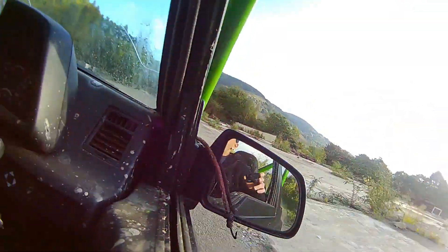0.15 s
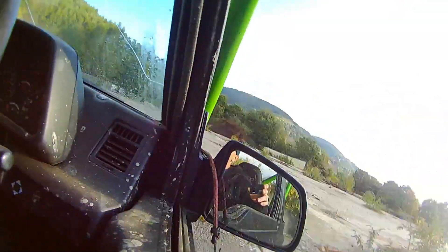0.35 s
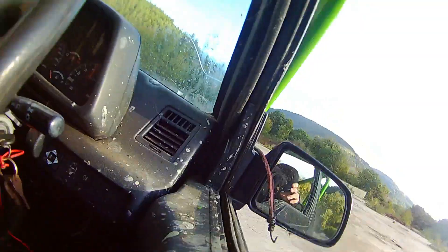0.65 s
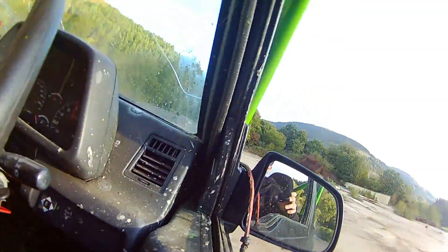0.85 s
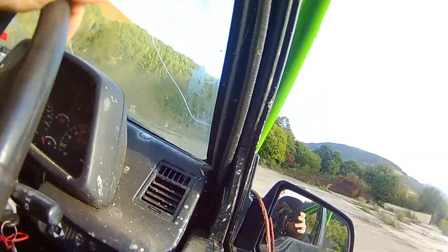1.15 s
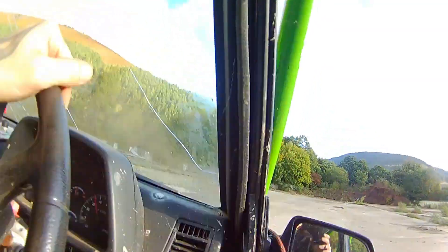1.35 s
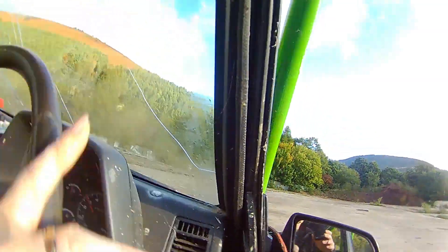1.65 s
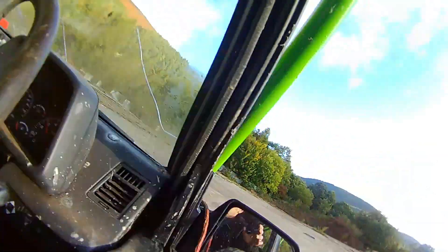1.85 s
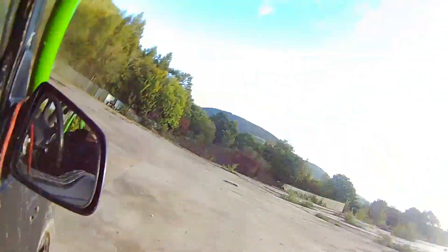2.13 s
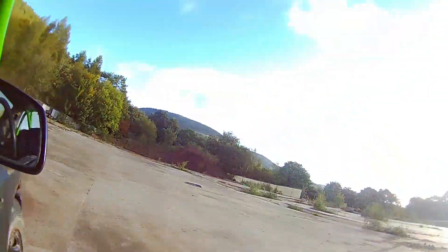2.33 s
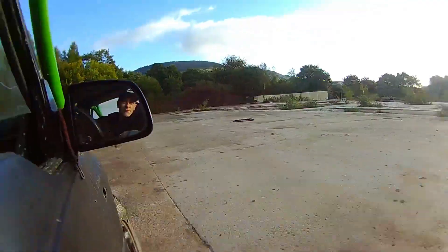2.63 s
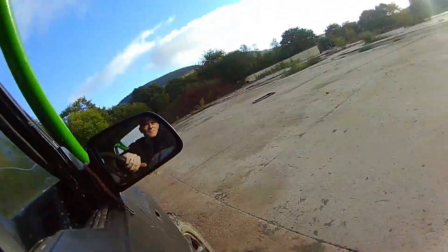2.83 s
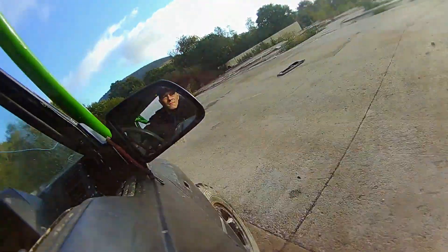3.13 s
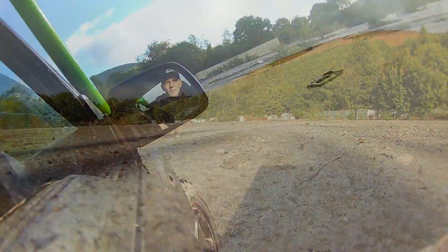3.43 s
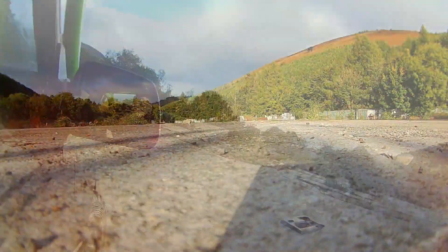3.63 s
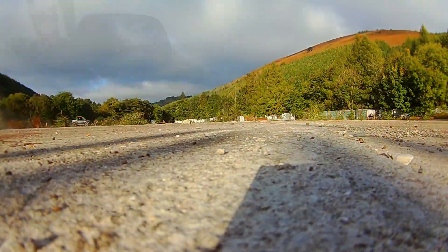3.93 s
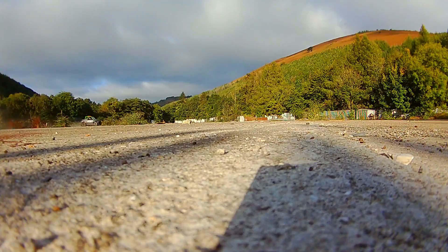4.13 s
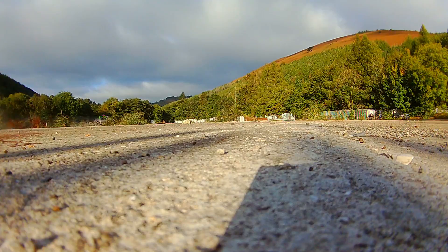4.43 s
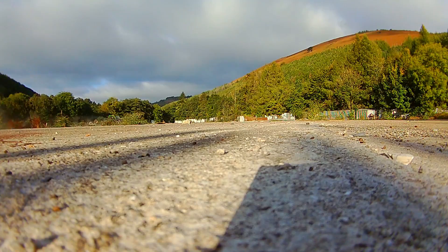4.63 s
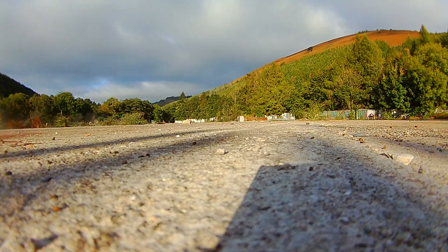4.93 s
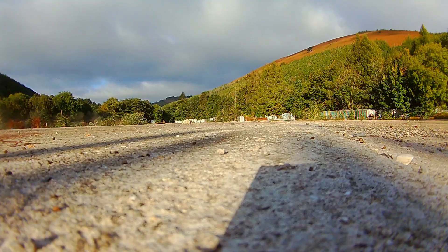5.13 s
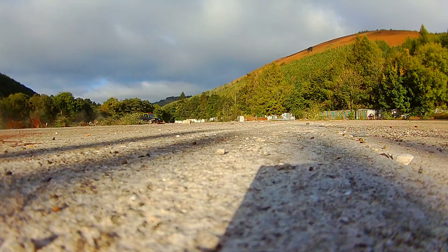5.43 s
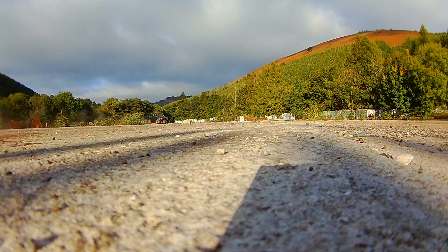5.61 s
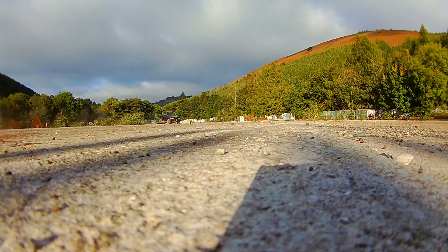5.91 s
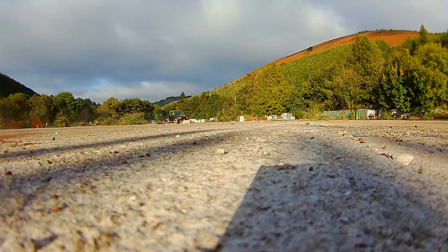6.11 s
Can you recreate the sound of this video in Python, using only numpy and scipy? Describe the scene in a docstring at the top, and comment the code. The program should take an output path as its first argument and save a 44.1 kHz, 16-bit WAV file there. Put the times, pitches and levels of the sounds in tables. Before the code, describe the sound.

A petrol buggy is heard from its open cab, loud and distorted: booming exhaust, tyres roaring over concrete, sizzling grit and wind, with gusts at the start and around 2 seconds. The engine note falls over the first 1.5 seconds, then wavers lower down, chugging when the throttle lifts near 0.5, 2 and 2.9 seconds. Short tyre squeals and knocks from stones and loose panels come at about 0.9 to 1.3 seconds, then again more busily from 2.9 to 3.5 as the buggy skids.

At 3.5 seconds a hard cut moves to a quieter position on the ground, some way off. The engine climbs to high revs by 4.4 seconds and holds a nasal drone over a broad roar, gravel hiss, a few tiny chassis squeaks and a very faint electronic whine. At about 5.8 seconds the throttle closes, the note drops and the tyres chirp faintly twice.

```python
"""A petrol buggy thrown around a concrete lot. First the microphone rides in the open cab: exhaust boom,
wind and tyre roar overload it, stones and loose panels knock, and the tyres squeal into a skid.
At 3.5 s a hard cut puts the microphone on the ground some way off, with a faint camera whine. The engine
pulls up to high revs and holds them over gravel hiss and small chassis squeaks; then the throttle
closes, the note drops and the tyres chirp."""
import sys
import numpy as np
from scipy import signal
from scipy.io import wavfile

SR = 44100
rng = np.random.default_rng(int(sys.argv[2]) if len(sys.argv) > 2 else 0)


def store_pcm(level_fs):
    """Save levels as 16-bit WAV."""
    pcm = np.round(np.clip(level_fs, -1, 1) * 32767).astype(np.int16)
    wavfile.write(sys.argv[1], SR, np.atleast_2d(pcm).T)


N = 276507
TIME = np.arange(N) / SR
CUT_S = 3.534

# Levels in the tables are relative; each source adds its own gain.
# engine speed in the cab: time_s, firing_hz
CAB_REVS = [(0.0, 150.5), (0.07, 153.2), (0.18, 143), (0.42, 141), (0.65, 129.5), (0.93, 116.5),
            (1.05, 116.2), (1.3, 96), (1.44, 87.8), (1.56, 98), (1.69, 94), (1.8, 99.7), (2.01, 102),
            (2.11, 90.5), (2.275, 95.5), (2.32, 105), (2.53, 102), (2.8, 108.5), (2.93, 119), (3.01, 99.6),
            (3.25, 90.1), (3.44, 91.5), (3.53, 96.5)]
# how the cab booms at the low firing orders: frequency_hz, level_db
CAB_BOOM = [(86, -12), (106, -9.5), (125, -5.5), (147, -7.5), (178, -9), (194, -13), (205, -7.5),
            (219, -16), (262, -9.5), (286, -5), (306, -12), (345, -15), (420, -16), (470, -23)]
# pipe resonances from the cab: frequency_hz, level_db
CAB_PIPE = [(380, 6), (480, 6), (570, -0.5), (660, 5.5), (800, -8.5), (1000, -21), (1500, -69)]
# the four cylinders fire unequally: level_db
CYLINDER_DB = [4, 1.5, 1, -1]
# wind buffeting the microphone: frequency_hz, level_db
WIND_SPECTRUM = [(22, 1.5), (40, -10.5), (70, -5), (130, -12), (250, -14), (500, -18.5), (1000, -36)]
# gusts on the microphone: centre_s, level_db
GUSTS = [(0.02, -8), (0.42, -10), (1.7, -32.5), (2.07, -17), (3.05, -31)]
# tyres scrubbing over concrete: time_s, roar_db, grit_db
SCRUB = [(0.0, -24.5, -40), (0.16, -21.5, -38), (0.93, -27, -39.5), (1.21, -25, -40), (1.47, -31.5, -42),
         (1.98, -24, -40.5), (2.24, -24, -46.5), (2.36, -22.5, -39), (2.92, -16.5, -38), (3.03, -19.5, -45),
         (3.49, -18.5, -40), (3.5, -16.5, -37)]
# tyre roar close up: frequency_hz, level_db
TYRE_SPECTRUM = [(100, 11), (250, 2.5), (600, 2), (900, -1), (1250, 3.5), (1700, -7), (2300, -10.5),
                 (4000, -25.5), (8000, -33), (15000, -82)]
# sprayed grit close up: frequency_hz, level_db
GRIT_SPECTRUM = [(2000, -34), (3800, 11.5), (5500, 1), (8000, 2.5), (11500, 2.5), (13200, -14),
                 (16000, -12)]
# air hiss in the cab: frequency_hz, level_db
AIR_SPECTRUM = [(3000, 2.5), (7000, -7), (11500, -6.5), (13200, -10), (16000, -6.5)]
# the driver lifts off the throttle: shut_s, reopen_s, pedal_travel_s, overtone_loss_db
LIFTS = [(0.537, 1.106, 0.12, 5.5), (1.99, 2.3, 0.063, 18.5), (2.898, 3.507, 0.029, 9),
         (5.845, 6.499, 0.031, 14)]
# stones and loose panels knock: start_s, level_db
KNOCKS = [(0.8606, -14.5), (0.9567, -23), (1.1473, -32), (1.166, -15), (1.9855, -19), (2.867, -15),
          (2.9504, -6.5), (2.9789, -12), (3.074, -15.5), (3.129, -15.5), (3.212, -12), (3.3156, -11),
          (3.4281, -22)]
# tyres hop and slide in the turns: centre_s, half_length_s, pitch_hz, level_db, octave_db
SQUEALS = [(0.89, 0.035, 732, -9, -39), (0.97, .018, 705, -6.5, -24), (1.093, 0.034, 667, -8, -18),
           (1.154, .012, 665, -8.5, -24), (1.237, .02, 649, -7.5, -23), (1.292, .025, 658, -10, -37),
           (2.93, 0.076, 620, -12, -31), (3.13, 0.054, 587, -15.5, -19), (3.225, .018, 549, -7.5, -5),
           (3.312, .035, 603.7, -8, -2.5), (3.345, .06, 544, -3.5, -7.5), (3.515, 0.021, 568, -6, -6),
           (6.014, 0.021, 708.6, -25, -47), (6.069, .02, 713, -28.5, -46)]
# the exhaust note drops out for an instant: centre_s, dip_db
BREAKS = [(2.306, -3), (2.925, -9), (3.385, -13), (5.85, -16)]
# engine speed at a distance: time_s, firing_hz
FAR_REVS = [(3.54, 120.1), (3.75, 123.3), (4.18, 136.6), (4.4, 141.7), (4.7, 140.6), (4.97, 145.2),
            (5.16, 143.1), (5.33, 146.7), (5.82, 139.8), (5.865, 130.7), (6.02, 106.9), (6.13, 83.7),
            (6.27, 84.1)]
# distant firing note: time_s, level_db
FAR_NOTE = [(3.6, -23), (3.62, -24), (3.74, -25), (3.84, -19.5), (3.99, -20.5), (4.24, -14.5), (5.6, -17),
            (5.95, -23), (6.27, -27.5)]
# distant nasal drone of orders 3 and 4: time_s, level_db
FAR_DRONE = [(3.6, -24.5), (4.1, -21), (4.55, -24), (5.2, -24.5), (5.7, -21), (5.85, -21.5)]
# pipe resonances at a distance: frequency_hz, level_db
FAR_PIPE = [(400, -4), (600, 11), (720, 5.5), (850, 3.5), (1000, -5), (1150, 1.5), (1400, -3), (2200, -39)]
# one order of the drone fades briefly: centre_s, half_length_s, order, dip_db
FADES = [(3.587, 0.059, 4, -13), (3.84, 0.058, 3, -4), (3.95, 0.053, 4, -8), (4.27, .06, 4, -4.5),
         (4.276, 0.054, 3, -13), (4.687, 0.078, 4, -11), (4.8, 0.13, 3, -13), (5.226, 0.07, 4, -7)]
# distant rush of the car: time_s, roar_db, gravel_db
FAR_RUSH = [(3.63, -35.5, -48.5), (3.81, -35, -52), (3.94, -35.5, -46.5), (5.3, -32.5, -45.5),
            (5.67, -32.5, -49.5), (5.81, -33, -46), (5.92, -36.5, -51.5), (6.27, -42.5, -56)]
# distant roar: frequency_hz, level_db
ROAR_SPECTRUM = [(25, -9), (50, 4.5), (100, -11), (200, 6.5), (350, 1), (600, 7), (900, 1), (1350, -0.5),
                 (1750, -10), (2200, -9.5), (3000, -24), (4500, -33), (8000, -64)]
# distant gravel hiss: frequency_hz, level_db
GRAVEL_SPECTRUM = [(2500, -10), (3700, 1), (4500, -11), (5500, -2), (7000, 3.5), (8900, -20), (11300, -10),
                   (14000, -29)]
# distant chassis squeaks: centre_s, pitch_hz, level_db
SQUEAKS = [(4.81, 7500, -38), (5.245, 2240, -25), (5.965, 10200, -52), (6.243, 6200, -58)]


def from_db(db):
    """Decibels to gain."""
    return 10 ** (np.asarray(db) / 20)


def rms_one(x):
    """Scale to unit power."""
    return x / np.sqrt(np.mean(x ** 2) + 1e-20)


def in_time(rows):
    """Each column of a curve table at every sample."""
    times, *columns = np.transpose(rows)
    return [np.interp(TIME, times, column) for column in columns]


def at_hz(spectrum, hz):
    """Read a spectrum on a log-frequency axis."""
    freqs, levels = np.transpose(spectrum)
    return np.interp(np.log(hz), np.log(freqs), levels)


def swell(centre_s, half_length_s):
    """A smooth rise and fall around a moment."""
    return np.exp(-((TIME - centre_s) / half_length_s) ** 2)


def drift(rate_hz):
    """Smooth random wander of spread 1."""
    hop, settle = 40, 2000
    pole = np.exp(-2 * np.pi * rate_hz * hop / SR)
    white = rng.standard_normal(N // hop + settle + 2)
    slow = signal.lfilter([1], [1, -2 * pole, pole * pole], white)[settle:]
    return np.interp(np.arange(N) / hop, np.arange(len(slow)), rms_one(slow))


def butter(x, hz, kind, order=2):
    """Causal Butterworth filter."""
    return signal.sosfilt(signal.butter(order, hz, kind, fs=SR, output="sos"), x)


def band_noise(low_hz, high_hz, order=2):
    """One band of noise at unit power."""
    return rms_one(butter(rng.standard_normal(N), [low_hz, high_hz], "band", order))


def noise(spectrum):
    """Unit-power noise shaped in quarter-octave bands, neighbours unrelated."""
    edges = 20 * 2 ** (np.arange(40) / 4)
    white, out = rng.standard_normal((2, N)), np.zeros(N)
    for k, (low, high) in enumerate(zip(edges, edges[1:])):
        if high > spectrum[0][0] and low < spectrum[-1][0]:
            band = butter(white[k % 2], [low, high], "band", order=3)
            out += from_db(at_hz(spectrum, np.sqrt(low * high))) * band
    return rms_one(out)


def firings(hz, loss_db, jitter, scatter, stumble):
    """Firings so far: the crank turns unevenly, and stumbles more the deeper the throttle lift."""
    count = np.cumsum(hz * (1 + jitter * drift(27))) / SR
    return count + (scatter + stumble * loss_db / loss_db.max()) * drift(69.7)


def exhaust(fired, hz, orders_db, rasp_db, pipe, flutter_db, uneven, smear):
    """Strong low firing orders, then a rasp of higher ones shaped by the pipe, which smears each pulse."""
    def order_wave(k):
        return np.sqrt(2) * np.sin(2 * np.pi * k * fired - smear * k * k)
    boom = sum(from_db(db + flutter_db * drift(42)) * order_wave(k) for k, db in enumerate(orders_db, 1))
    upper = np.arange(len(orders_db) + 1, 15)
    gains = [from_db(at_hz(pipe, k * hz)) for k in upper]
    rasp = sum(gain * from_db(4 * drift(9.9)) * order_wave(k) for k, gain in zip(upper, gains))
    rasp /= np.sqrt(sum(gain ** 2 for gain in gains))
    cylinder_db = np.interp(fired, np.arange(4), CYLINDER_DB, period=4)
    return (boom + from_db(rasp_db) * rasp) * from_db(uneven * cylinder_db) * note_breaks()


def cab_engine(shut, loss_db):
    """Close exhaust and its firing count; off the throttle the note booms and chugs as overtones fade."""
    hz, = in_time(CAB_REVS)
    coast_db = 3 * shut + 0.15 * loss_db
    chug_db = 2 * shut * drift(21.4)
    note_db = at_hz(CAB_BOOM, hz) + coast_db + chug_db
    orders_db = [note_db] + [at_hz(CAB_BOOM, k * hz) - loss_db for k in (2, 3)]
    fired = firings(hz, loss_db, jitter=0.0032, scatter=0.006, stumble=0.02)
    rasp_db = -14.5 - loss_db
    return exhaust(fired, hz, orders_db, rasp_db, CAB_PIPE, flutter_db=1.82, uneven=0.09, smear=1.4), fired


def wind():
    """A steady breeze and a few gusts buffet the microphone."""
    gusts = sum(from_db(db) * swell(s, half_length_s=0.13) for s, db in GUSTS)
    return (from_db(-16.5) + gusts) * noise(WIND_SPECTRUM)


def tyre_roar(effort_db):
    """Tread scrubs over concrete, close to the microphone."""
    return from_db(-13 + 1.23 * effort_db + 0.2 * drift(73)) * noise(TYRE_SPECTRUM)


def puffs(fired, depth):
    """A pulsing gain: gas leaves in one puff per firing."""
    return rms_one(np.exp(depth * np.cos(2 * np.pi * fired)))


def overload(x, drive_db, ceiling, droop_hz):
    """The microphone squares off the wave; its AC coupling makes the flat tops droop."""
    return butter(ceiling * np.tanh(from_db(drive_db) * x), droop_hz, "high", order=1)


def throttle():
    """How far the throttle is shut (0-1), and the dB of overtones that this costs."""
    lifts = [np.clip(np.minimum(TIME - shut_s, reopen_s - TIME) / travel_s + 0.5, 0, 1)
             for shut_s, reopen_s, travel_s, _ in LIFTS]
    return sum(lifts), sum(lift * db for lift, (*_, db) in zip(lifts, LIFTS))


def knocks(t60_s):
    """Stones and loose panels strike near the microphone, each a short, dying clatter."""
    envelope = sum(from_db(db - 60 * np.abs(TIME - s) / t60_s) * (TIME >= s) for s, db in KNOCKS)
    return from_db(4.5) * envelope * band_noise(750, 3240)


def squeals(rows, fall, waver, flutter_db, scrub_db):
    """Tread sticks and slips at an unsteady, sagging pitch and its octave, in a puff of scrubbing noise."""
    out, wobble = np.zeros(N), 1 + waver * drift(83)
    scrub = from_db(scrub_db) * band_noise(650, 1400, order=1)
    for centre_s, half_length_s, hz, db, octave_db in rows:
        span = np.abs(TIME - centre_s) < 4 * half_length_s
        age = (TIME[span] - centre_s) / half_length_s
        pitch_hz = hz * wobble[span] * (1 - fall * np.tanh(age))
        phase = 2 * np.pi * np.cumsum(pitch_hz) / SR
        voice = from_db(db) * (np.sin(phase) + scrub[span]) + from_db(octave_db) * np.sin(2 * phase)
        out[span] += np.exp(-age ** 2) * voice
    return out * from_db(flutter_db * drift(60))


def note_breaks():
    """Gain of the exhaust note, which now and then drops out for an instant."""
    return from_db(sum(db * swell(s, half_length_s=0.0077) for s, db in BREAKS))


def from_the_cab(shut, loss_db):
    """Engine, wind and tyres at close range, all fighting for the same overloaded microphone."""
    tyre_db, grit_db = in_time(SCRUB)
    effort_db = tyre_db - tyre_db[TIME < CUT_S].mean()
    engine, fired = cab_engine(shut, loss_db)
    close = engine + wind() + tyre_roar(effort_db) * puffs(fired, depth=0.027)
    close += squeals(SQUEALS, fall=0.02424, waver=0.0366, flutter_db=4, scrub_db=-32)
    close += knocks(t60_s=0.028)
    close *= from_db(0.12 * effort_db - 3.24)   # the harder the tyres scrub, the louder it all arrives
    # most of the grit spray is heard only between the flat tops, so it sizzles at the engine's rate
    spray = from_db(grit_db + 3) * noise(GRIT_SPECTRUM)
    air_hiss = from_db(grit_db + 2.5 - 0.25 * loss_db) * noise(AIR_SPECTRUM)
    return overload(close + spray, drive_db=11, ceiling=0.85, droop_hz=14) + air_hiss


def far_engine(roar_db, loss_db):
    """Distant exhaust and its firing count: a firing note under a nasal drone and a rasp."""
    hz, = in_time(FAR_REVS)
    note_db, = in_time(FAR_NOTE)
    drone_db, = in_time(FAR_DRONE)
    revs_db = 0.06 * (hz - 140)   # order 3 gains as the revs rise
    orders_db = [note_db,
                 note_db - 9 - 0.5 * loss_db + fading(2),
                 drone_db - 3.5 + revs_db - 0.79 * loss_db + fading(3),
                 drone_db - 1.4 * loss_db + fading(4)]
    fired = firings(hz, loss_db, jitter=0.00415, scatter=0.0063, stumble=0.043)
    rasp_db = roar_db + 0.5 - 0.17 * loss_db
    engine = exhaust(fired, hz, orders_db, rasp_db, FAR_PIPE, flutter_db=0.63, uneven=0.29, smear=0.414)
    return engine, fired


def fading(order):
    """Gain in dB of one overtone, which wanders and now and then fades on its way over the lot."""
    dips_db = sum(db * swell(s, half_length_s) for s, half_length_s, k, db in FADES if k == order)
    return 1.9 * drift(3.7) + dips_db


def far_roar(roar_db, fired):
    """The car's broad roar across the lot, pulsing with the firings."""
    return from_db(roar_db + 8.5 + 0.45 * drift(13)) * noise(ROAR_SPECTRUM) * puffs(fired, depth=0.11)


def gravel(gravel_db, ticks_per_s, decay_s):
    """Thrown stones: random ticks of uneven size over a hiss."""
    hiss = from_db(gravel_db - 1.5 + 0.74 * drift(4.6)) * noise(GRAVEL_SPECTRUM)
    hits = rng.random(N) < ticks_per_s / SR
    sizes = from_db(-4 * np.minimum(rng.exponential(1, N), 3))
    ticks = signal.lfilter([1], [1, -np.exp(-1 / (decay_s * SR))], hits * sizes)
    return hiss * rms_one(1 + ticks)


def camera_whine(pitch_hz):
    """A faint electronic tone from the camera on the ground."""
    return from_db(-59.5) * np.sin(2 * np.pi * pitch_hz * TIME)


def chassis_squeaks(half_length_s, fall, waver, scrub_db):
    """Brief rubbing tones that swell, sag in pitch and fade, each in a puff of scrubbing noise."""
    out, wobble = np.zeros(N), 1 + waver * drift(80)
    for centre_s, hz, db in SQUEAKS:
        age = (TIME - centre_s) / half_length_s
        pitch_hz = hz * wobble * (1 - fall * np.tanh(age))
        tone = np.sin(2 * np.pi * np.cumsum(pitch_hz) / SR)
        scrub = from_db(scrub_db) * band_noise(hz, 2 * hz)
        out += from_db(db) * np.exp(-age ** 2) * (tone + scrub)
    return out


def from_the_ground(loss_db):
    """Microphone low and some way off: the exhaust note leads, over roar and gravel."""
    roar_db, gravel_db = in_time(FAR_RUSH)
    engine, fired = far_engine(roar_db, loss_db)
    roar = far_roar(roar_db, fired)
    stones = gravel(gravel_db, ticks_per_s=84, decay_s=0.0013)
    far_squeals = [row for row in SQUEALS if row[0] > CUT_S]
    chirps = squeals(far_squeals, fall=0.044, waver=0.031, flutter_db=-0.5, scrub_db=-38)
    squeaks = chassis_squeaks(half_length_s=0.0034, fall=0.0053, waver=0.0084, scrub_db=-15)
    return engine + roar + stones + camera_whine(pitch_hz=13750) + squeaks + chirps


def scene():
    """The cab, then a hard cut to the ground, in mono."""
    shut, loss_db = throttle()
    return np.where(TIME < CUT_S, from_the_cab(shut, loss_db), from_the_ground(loss_db))[None, :]


def record(dry):
    """The wave clips at full scale and the treble is cut steeply above 16 kHz."""
    lowpass = signal.ellip(10, 0.1, 90, 16000, fs=SR, output="sos")
    return signal.sosfilt(lowpass, np.clip(dry, -1, 1))


dry = scene()
out = record(dry)
store_pcm(out)
```